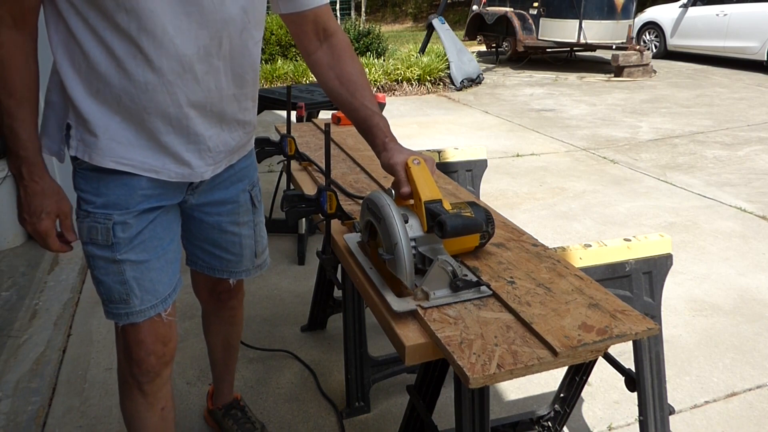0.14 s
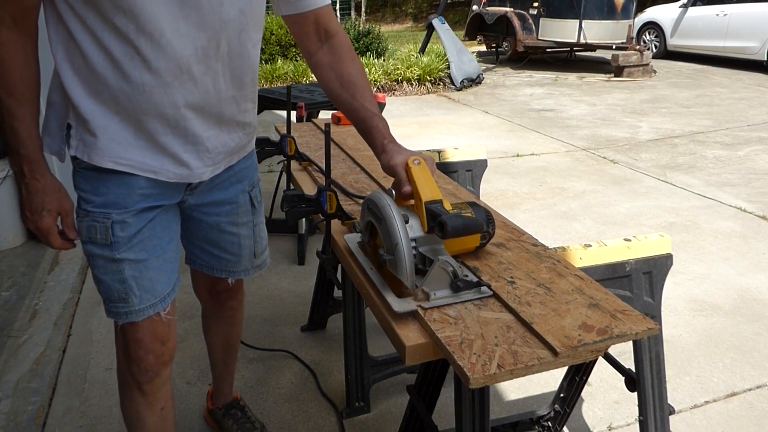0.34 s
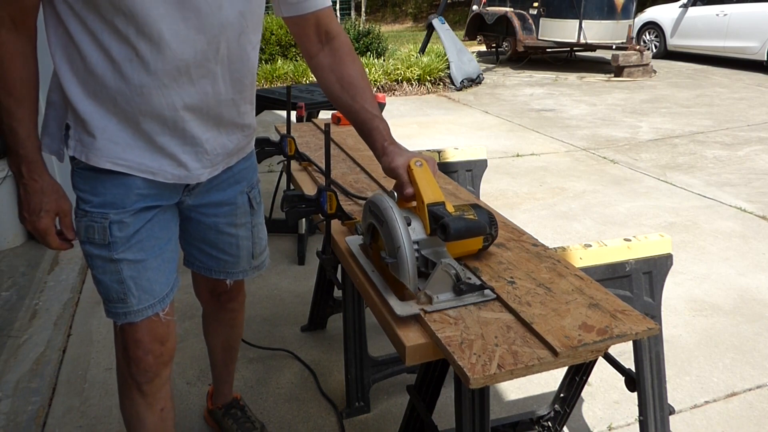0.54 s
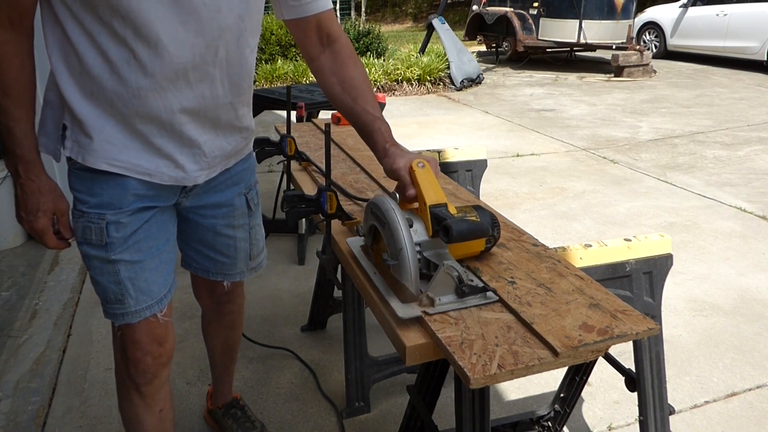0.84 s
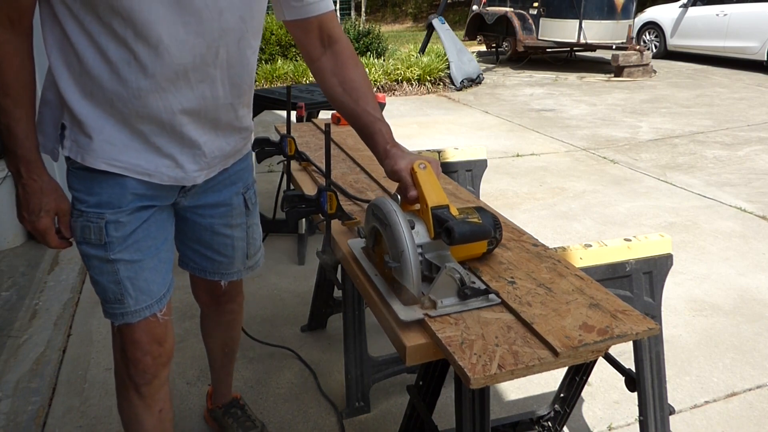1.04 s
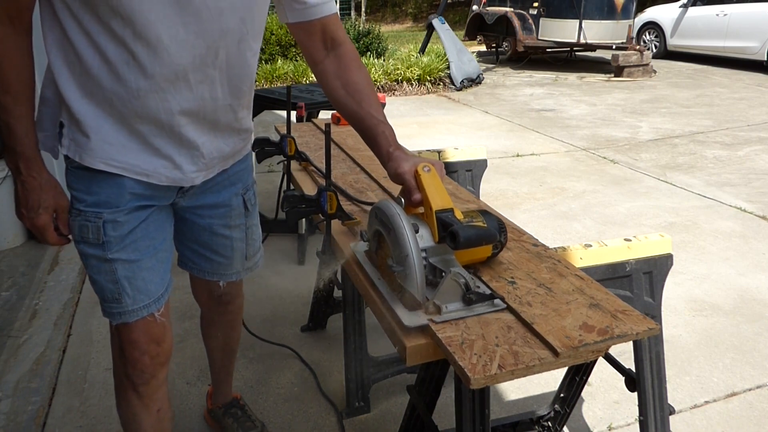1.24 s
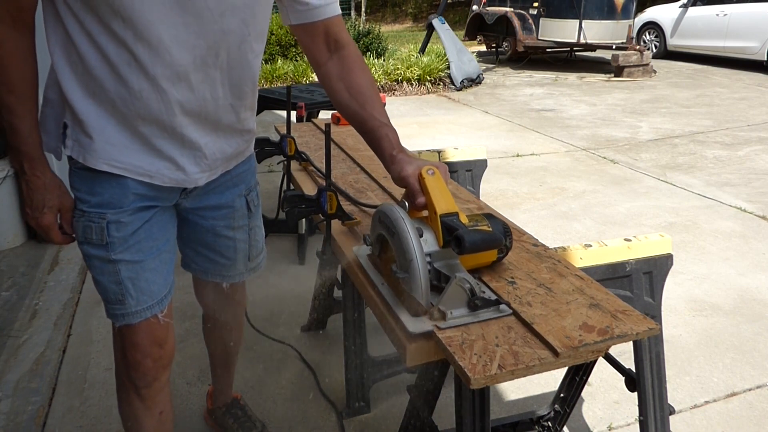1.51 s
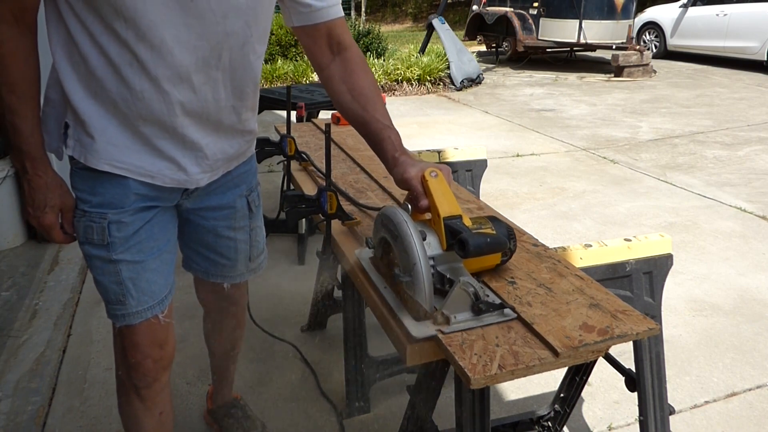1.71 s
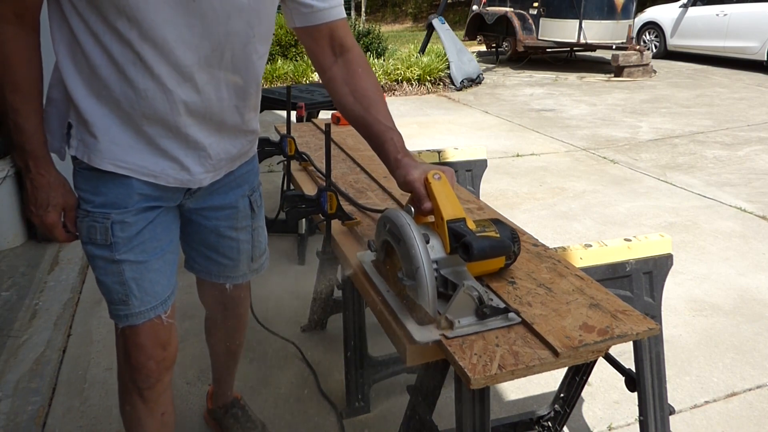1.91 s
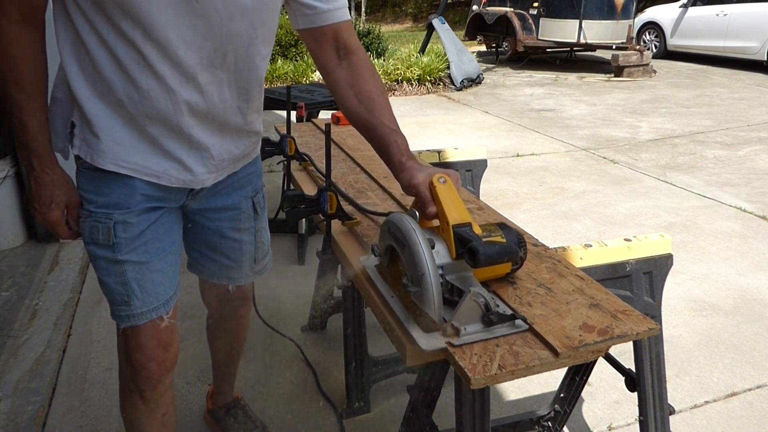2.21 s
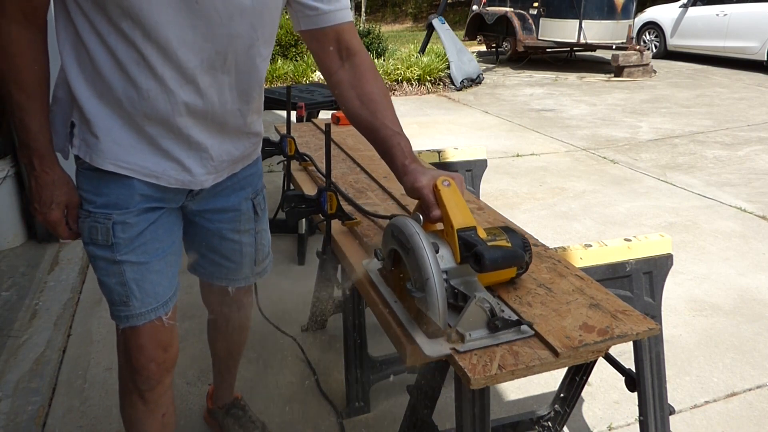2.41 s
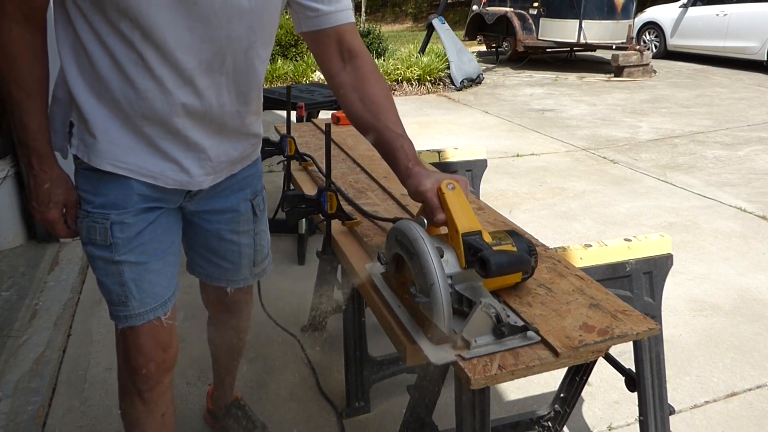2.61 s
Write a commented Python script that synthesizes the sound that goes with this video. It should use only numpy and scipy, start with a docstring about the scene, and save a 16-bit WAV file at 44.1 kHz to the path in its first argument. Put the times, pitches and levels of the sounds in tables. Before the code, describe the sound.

A corded circular saw clanks on, whines up to speed, then rasps steadily through a wooden board.

```python
"""A clank and a growl are heard first: a corded circular saw is switched on at the mouth of a garage.
Gears knock and the motor draws a rush of current; brushes and fan hiss while the blade spins up.
Gears and teeth rasp (noise and tiny impacts); pushed into a wooden board, the saw sags in speed.
The blade rings with brief surges, woody resonances sound and the motor hums faintly (a wavering tone).
Short reflections from the garage and quiet outdoor air (filtered noise and a drone) surround it."""
import sys
import numpy as np
from scipy import signal
from scipy.fft import rfft, irfft
from scipy.io import wavfile

SR = 44100
rng = np.random.default_rng(int(sys.argv[2]) if len(sys.argv) > 2 else 0)


def transcribe(u):
    """Save the signal u as a 16-bit wav file named by the first command-line argument.

    u: samples, shape (n,) or (channels, n), limited to [-1, 1]; the rate is SR.
    q: integer samples, one column per channel.
    """
    v = np.clip(np.atleast_2d(u).T, -1, 1)
    q = np.round(v * 32767).astype(np.int16)
    wavfile.write(sys.argv[1], SR, q)


N = 121275
TIME = np.arange(N) / SR  # s
HZ = np.fft.rfftfreq(N, 1 / SR)
ON_S = 0.113  # moment the trigger is pulled
MAINS_HZ, TEETH = 60, 24


def amp(db):
    """Turns decibels into a gain."""
    return 10 ** (np.asarray(db) / 20)


def unit(x):
    """Scales a sound to an rms level of 1."""
    return x / np.sqrt(np.mean(x ** 2) + 1e-20)


def curve(rows):
    """Joins the points of a timed table by straight lines, one value per sample."""
    return np.interp(TIME, *np.transpose(rows))


def by_pitch(points):
    """Reads a table of frequency and level at every frequency, along a logarithmic pitch scale."""
    hz, db = np.transpose(points)
    return np.interp(np.log(HZ + 1), np.log(hz), db)


def slow(hz):
    """Random wavering of rms 1, mostly slower than the given rate."""
    smoothing = (HZ > 1) / (1 + (HZ / hz) ** 4)
    return unit(irfft(rfft(rng.standard_normal(N)) * smoothing, N))


def switched(rise_s):
    """Rises from silence when the trigger is pulled."""
    return np.clip((TIME - ON_S) / rise_s, 0, 1)


def mains(depth):
    """The motor's torque throbs twice in each cycle of the mains."""
    return 1 + depth * np.cos(4 * np.pi * MAINS_HZ * (TIME - ON_S))


def each_turn(turns, size=700):
    """Roughness of gears and teeth that comes round again with every turn of the blade."""
    pattern = rng.standard_normal(size)
    return unit(np.interp(turns % 1, np.arange(size) / size, pattern, period=1))


def grit(per_s, spread_db):
    """A dense train of tiny impacts of uneven size at random moments."""
    size = amp(spread_db * np.minimum(rng.exponential(1, N), 4))
    hits = rng.random(N) < per_s / SR
    return unit(size * rng.standard_normal(N) * hits)


def resonate(x, hz, width):
    """A resonance whose centre follows the curve hz; width in Hz sets how fast it dies away."""
    turn = np.exp(2j * np.pi * np.cumsum(hz) / SR)
    r = np.exp(-np.pi * width / SR)
    # shift the centre down to zero, smooth there, and shift back up
    smooth = signal.lfilter([(1 - r) ** 2], [1, -2 * r, r * r], x / turn)
    return unit((turn * smooth).real)


# resonances of housing, guard and board, scaled by "body" where used:
# (frequency [Hz], width [Hz], lift [dB])
BODY_RESONANCES = [(246.5, 27, 8.5), (353.8, 34, 10), (381, 27, -11), (494.7, 122, 5), (829, 57, 5.5),
                   (1522, 26, 5.5), (4110, 60, 9), (4330, 180, -4.5), (4850, 1170, 6.5), (6060, 106, 7),
                   (10540, 170, 4.5), (13350, 300, 0.5)]


def colour(x, points, body=1):
    """Filters by a spectrum and the resonances of the saw's body, with no sound ahead of its cause."""
    db = by_pitch(points)
    for hz, width, lift in BODY_RESONANCES:
        db = db + body * lift / (1 + (2 * (HZ - hz) / width) ** 2)
    # folding the log spectrum makes a filter that responds as early as possible
    fold = irfft(np.log(amp(db)), N)
    fold[1:N // 2] *= 2
    fold[N // 2:] = 0
    response = irfft(np.exp(rfft(fold)), N)[:4096]
    return unit(signal.fftconvolve(x, response)[:N])


# blade speed, before a slight random waver: (time [s], speed [turns per second])
BLADE_SPEED = [(.112, 5), (.3, 42), (.58, 57.5), (1.05, 64.4), (1.45, 57.6), (2.75, 53.9)]


def blade_turns():
    """Adds up the wavering speed into the number of turns the blade has made."""
    return np.cumsum(curve(BLADE_SPEED) * (1 + 0.00212 * slow(hz=21.9))) / SR


# knocks as the gears take up their slack: (time [s], level [dB], time to fade by 60 dB [s])
GEAR_KNOCKS = [(0.1181, -10.5, 0.025), (0.124, -27, 0.014), (0.135, -24, 0.018)]
# spectrum of the knocks: (frequency [Hz], level [dB per Hz])
CLANK_SPECTRUM = [(50, -22), (400, -3), (1500, -2), (6400, 7.5), (11000, -3), (16000, -36)]
KNOCK_RISE_S = 0.0014


def knocks():
    """The gears take up their slack: each knock rises briefly to its time, then fades."""
    level = 0
    for s, db, t60 in GEAR_KNOCKS:
        rise = np.clip(1 + (TIME - s) / KNOCK_RISE_S, 0, 1)
        level = level + rise * amp(db - 60 * np.maximum(TIME - s, 0) / t60)
    return level * colour(rng.standard_normal(N), CLANK_SPECTRUM)


# spectrum of the growl: (frequency [Hz], level [dB per Hz])
GROWL_SPECTRUM = [(40, -33), (150, -28), (300, -11.5), (750, -4), (1100, 8.5), (3000, 1), (6000, -16.5),
                  (16000, -46)]
# a hard jolt of current, then a longer fade as the motor spins up (T60: seconds to fade by 60 dB)
INRUSH_DB, INRUSH_RISE_S, INRUSH_HOLD_S, INRUSH_T60 = -17, 0.0053, 0.017, 0.073
SPIN_DB, SPIN_T60 = -19, 0.63


def growl():
    """The motor growls on its rush of current, hard at first, then less as it gathers speed."""
    age = np.maximum(TIME - ON_S, 0)
    inrush = amp(INRUSH_DB - 60 * np.maximum(age - INRUSH_HOLD_S, 0) / INRUSH_T60)
    spin = amp(SPIN_DB - 60 * age / SPIN_T60)
    noise = colour(rng.standard_normal(N), GROWL_SPECTRUM, body=1.46)
    rough = noise * mains(depth=0.047) * amp(1.5 * slow(hz=245))
    return switched(INRUSH_RISE_S) * np.hypot(inrush, spin) * rough


# modes of the housing, level before doubling:
# (frequency [Hz], level [dB], time to fade by 60 dB [s])
HOUSING_MODES = [(506, -23.5, 0.089), (847, -27, 0.31), (1064, -25, 0.29), (1565, -29.5, 0.77)]
RING_WAVER_RAD = 0.4


def housing():
    """The jolt of the start sets the housing ringing in a few fading, wavering tones."""
    age = np.maximum(TIME - ON_S, 0)
    ring = 0
    for hz, db, t60 in HOUSING_MODES:
        level = amp(db - 60 * age / t60 + 1.07 * slow(hz=40))
        phase = 2 * np.pi * (hz * TIME + rng.random()) + RING_WAVER_RAD * slow(hz=29.7)
        ring = ring + level * np.sin(phase)
    return 2 * ring * switched(0.01)


# spectrum of the hiss: (frequency [Hz], level [dB per Hz])
HISS_SPECTRUM = [(300, -69), (2000, -30), (3400, -17.5), (6800, -11), (8000, -1.5), (9900, 1),
                 (10800, -3.5), (12100, -4.5), (13700, -11.5), (15700, -20)]
# loudness of brushes and fan: (time [s], level [dB])
HISS_LEVEL = [(.113, -27), (.145, -21.5), (.19, -17), (.23, -21.5), (.72, -19.5), (1.28, -20), (1.4, -22),
              (1.47, -20.6), (2.75, -21)]


def hiss(turns):
    """Sparking brushes, fan and flying dust: a bright, fluttering sizzle of noise."""
    rush = rng.standard_normal(N) + 0.53 * each_turn(turns)
    flutter = amp(0.68 * slow(hz=28.3) + 0.63 * slow(hz=295))
    drive = rush * mains(depth=0.026) * flutter
    return colour(drive, HISS_SPECTRUM) * switched(0.002) * amp(curve(HISS_LEVEL))


CLUMP_DB = 1.5  # rms swing of each band


def clumped(x, count=9):
    """Each of a row of overlapping pitch bands swells and fades by itself."""
    place = by_pitch([(700, 0), (7000, count - 1)])  # band number at each frequency
    spectrum = rfft(x)
    total = 0
    for k in range(count):
        band = irfft(spectrum * np.maximum(1 - abs(place - k), 0), N)
        total = total + band * amp(CLUMP_DB * slow(hz=21.7))
    return unit(total)


# spectrum of the rasp: (frequency [Hz], level [dB per Hz])
RASP_SPECTRUM = [(60, -68), (150, -29.5), (300, -18), (400, -16.5), (500, -8.5), (730, -10.5), (1120, -1),
                 (2000, -.5), (2750, -1.5), (3200, -8), (9000, -10), (16000, -24)]
# shared level of rasp and whine, before the rasp's gain of 1.33: (time [s], level [dB])
RASP_LEVEL = [(.3, -32), (.7, -32.5), (1.2, -33.5), (1.35, -31.5), (1.52, -33.5), (1.72, -32.5),
              (2.0, -34.5), (2.5, -35.5), (2.75, -35)]
# whine of gears and teeth, level before RASP_LEVEL: (multiple of blade speed [-], level [dB])
WHINE_ORDERS = [(22, -14), (72, -13.5), (111, -38)]
CHIPS_DB, WHINE_WAVER_DB = -9.5, 2.5


def rasp(turns):
    """Gears and teeth scrape once per tooth, chips snap off, and a whine follows the blade speed."""
    teeth = 1 + 0.27 * np.cos(2 * np.pi * TEETH * turns)
    scrape = grit(per_s=9000, spread_db=2.5) * teeth
    chips = amp(CHIPS_DB) * grit(per_s=250, spread_db=0.5)
    drive = (scrape + chips + 0.48 * each_turn(turns)) * amp(0.27 * slow(hz=59.0))
    whine = 0
    for order, db in WHINE_ORDERS:
        level = amp(db + WHINE_WAVER_DB * slow(hz=4.1))
        whine = whine + level * np.sin(2 * np.pi * order * turns + 0.41 * slow(hz=25))
    rough = 1.33 * clumped(colour(drive, RASP_SPECTRUM)) * switched(0.022)
    return (rough + whine * switched(0.25) ** 2) * amp(curve(RASP_LEVEL))


# ring of the blade, before a gain of 0.93: (time [s], level [dB])
RING_LEVEL = [(.2, -32.5), (.28, -39.5), (.45, -36), (.62, -31), (.7, -43), (.78, -34.5), (.92, -32.5),
              (1.03, -38), (1.35, -33), (1.8, -34.5), (2.05, -35.5), (2.55, -36.5), (2.7, -30.5)]
# brief surges in the blade's ring, before the same gain: (time [s], level [dB])
RING_SURGES = [(.316, -36), (.391, -34), (.433, -32), (.89, -38)]
# modes of the blade, width doubled in use: (frequency [Hz], half the filter's width [Hz], level [dB])
BLADE_MODES = [(2300, 41, 4.5), (2440, 27, 4.5), (2535, 90, 4)]
SURGE_S, RUB_SHARPNESS = 0.012, 0.91  # half length of a surge; how strongly the rub peaks each turn


def blade(turns):
    """The steel disc rubs once a turn and rings, with brief surges."""
    level = amp(curve(RING_LEVEL))
    for s, db in RING_SURGES:
        level = level + amp(db) * np.exp(-((TIME - s) / SURGE_S) ** 2)
    rub = rng.standard_normal(N) * np.exp(RUB_SHARPNESS * np.cos(2 * np.pi * turns))
    ring = 0
    for hz, width, db in BLADE_MODES:
        centre = hz * (1 + 0.003 * slow(hz=8.1))
        ring = ring + amp(db) * resonate(rub, centre, 2 * width)
    return unit(ring) * switched(0.029) * level * 0.93


# woody resonances, levels relative to each other: (frequency [Hz], width [Hz], level [dB])
WOODY_MODES = [(824.6, 21, -8), (966.7, 74, 2), (1224.6, 51, -2.5), (1551, 29, -1)]
# loudness of the woody resonances together: (time [s], level [dB])
WOODY_LEVEL = [(.2, -31.5), (.27, -34.5), (.32, -36.5), (1.22, -44), (1.35, -34), (1.52, -41), (1.7, -36.5),
               (1.92, -43)]
WOODY_DRIFT = 0.016  # rms share of each frequency


def woody_resonances():
    """Tiny impacts excite narrow, woody resonances that drift at random, from spin-up into the cut."""
    wood = 0
    for hz, width, db in WOODY_MODES:
        impacts = grit(per_s=1400, spread_db=3.5)
        centre = hz * (1 + WOODY_DRIFT * slow(hz=6.1))
        wood = wood + amp(db) * resonate(impacts, centre, width)
    return unit(wood) * switched(0.044) * amp(curve(WOODY_LEVEL))


SING_S, SING_LENGTH_S, SING_HZ, SING_DB = 1.715, 0.066, 1246, -34.5  # length: half the swell


def sing():
    """One short, wavering squeal of the saw in the cut."""
    swell = np.exp(-((TIME - SING_S) / SING_LENGTH_S) ** 2)
    tone = np.sin(2 * np.pi * SING_HZ * TIME + 0.16 * slow(hz=70))
    return amp(SING_DB) * swell * unit(tone * amp(1.2 * slow(hz=90)))


# loudness of the motor's hum: (time [s], level [dB])
HUM_LEVEL = [(.3, -70), (.7, -88), (1.04, -81), (1.25, -64), (1.42, -60), (1.8, -68.5), (2.5, -74),
             (2.75, -65)]
HUM_WAVER_RAD = 0.25


def hum():
    """The motor's windings hum at twice the mains rate, with a slightly wavering phase."""
    tone = np.sin(4 * np.pi * MAINS_HZ * TIME + HUM_WAVER_RAD * slow(hz=15))
    return unit(tone) * switched(0.01) * amp(curve(HUM_LEVEL))


# tone of the reflections: (frequency [Hz], level [dB])
REFLECTION_LEVEL = [(100, -23.5), (500, -2.5), (9500, -15), (13000, -7.5)]
ROOM_T60 = 0.079  # seconds to fade by 60 dB


def garage(x):
    """Short reflections from floor, bench and walls: scattered fading echoes, different at each ear."""
    t = TIME[:SR // 3]
    shape = (2, len(t))
    echoes = rng.standard_normal(shape) * (rng.random(shape) < 0.1)
    echoes = echoes * (t > 0.002) * amp(-60 * t / ROOM_T60)
    echoes = echoes / np.linalg.norm(echoes, axis=1, keepdims=True)
    sent = irfft(rfft(x) * amp(by_pitch(REFLECTION_LEVEL)), N)
    return signal.fftconvolve(sent[None], echoes, axes=1)[:, :N]


# spectrum of the outdoor air: (frequency [Hz], level [dB per Hz])
AIR_SPECTRUM = [(120, -2), (550, 0.5), (3000, -3), (8000, -11), (15000, -25)]
AIR_DB = -53  # gain of the air; the parts shared and separate at the two ears add up
DRONE_HZ, DRONE_DB = 128, -70.5  # peak level


def outdoors():
    """Quiet outdoor air, partly different at each ear, with a distant drone."""
    left, right, both = [colour(rng.standard_normal(N), AIR_SPECTRUM, body=0) for _ in range(3)]
    drone = amp(DRONE_DB) * np.sin(2 * np.pi * DRONE_HZ * TIME + 0.4 * slow(hz=8.6))
    return amp(AIR_DB) * (both + 0.55 * np.array([left, right])) + drone


LEFT_DB = 0.52  # how much louder the saw is on the left


def scene():
    """The saw stands just left of centre in the garage, with outdoor air behind it."""
    turns = blade_turns()
    saw = knocks() + growl() + housing() + hiss(turns) + rasp(turns)
    saw = saw + blade(turns) + woody_resonances() + sing() + hum()
    balance = amp([[LEFT_DB / 2], [-LEFT_DB / 2]])
    return (saw + garage(saw) * switched(0.002)) * balance + outdoors()


CEILING, EDGE_HZ = 0.88, 15820  # highest peak before filtering; upper edge of the band


def record(dry):
    """The recorder rounds off the highest peaks, cuts the rumble and limits the band."""
    held = dry / (1 + (dry / CEILING) ** 6) ** (1 / 6)
    held = signal.sosfilt(signal.butter(2, 85, "high", fs=SR, output="sos"), held)
    lowpass = signal.firwin(511, EDGE_HZ, window=("kaiser", 9), fs=SR)
    return signal.oaconvolve(held, lowpass[None], "same")


dry = scene()
out = record(dry)
transcribe(out)
```